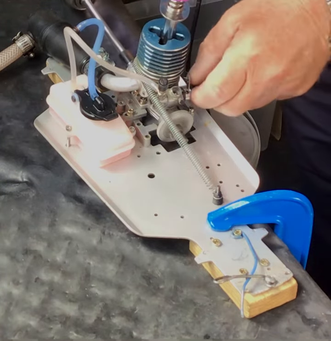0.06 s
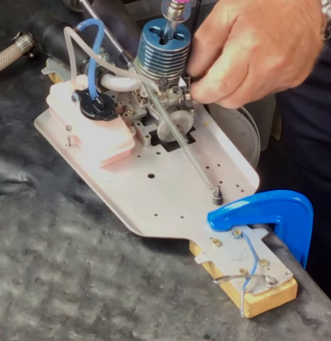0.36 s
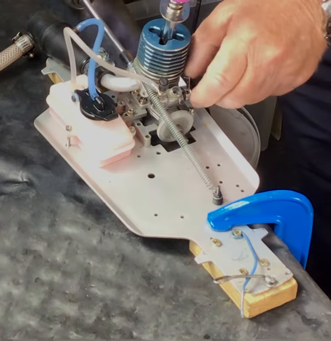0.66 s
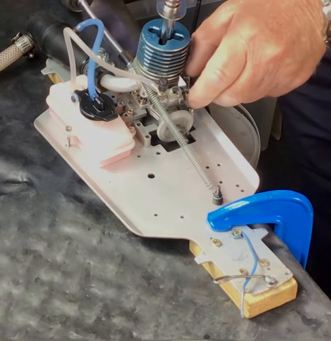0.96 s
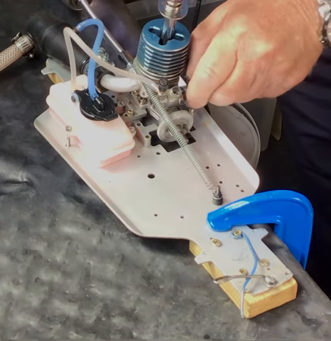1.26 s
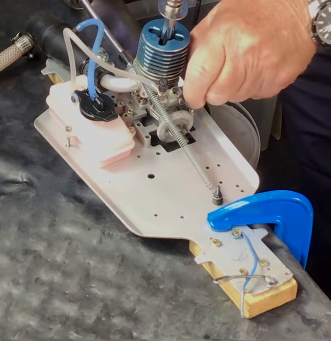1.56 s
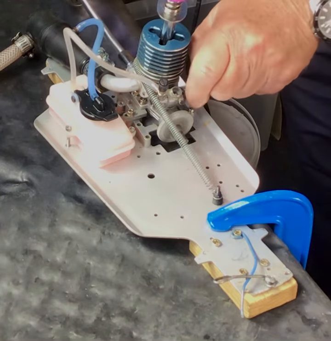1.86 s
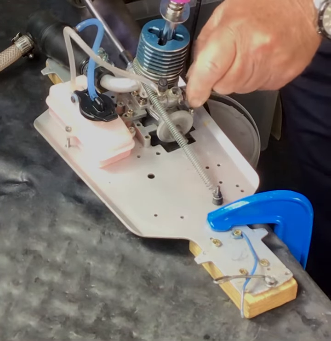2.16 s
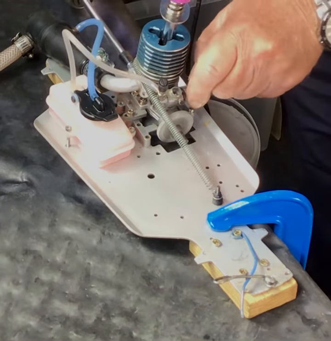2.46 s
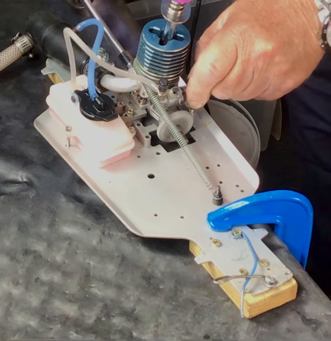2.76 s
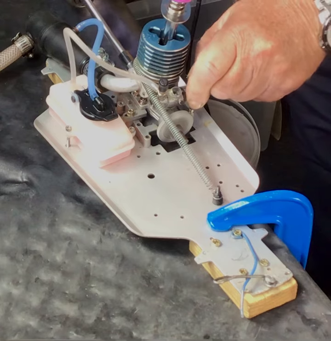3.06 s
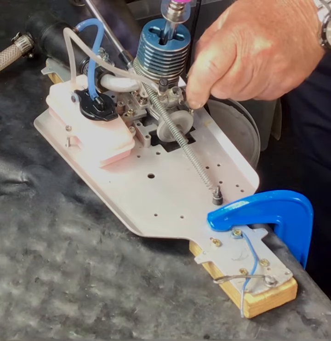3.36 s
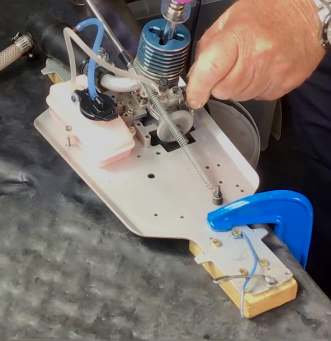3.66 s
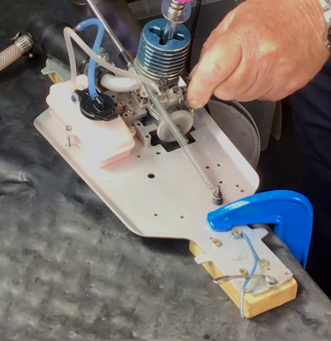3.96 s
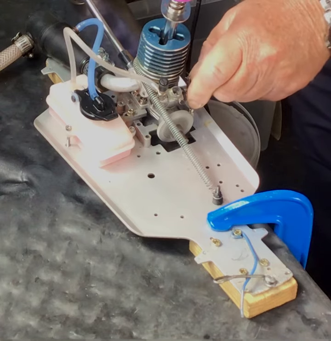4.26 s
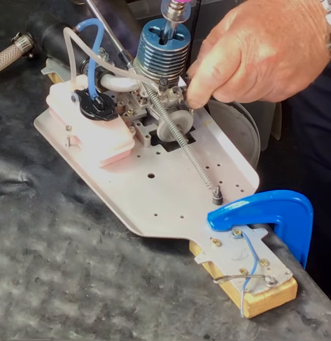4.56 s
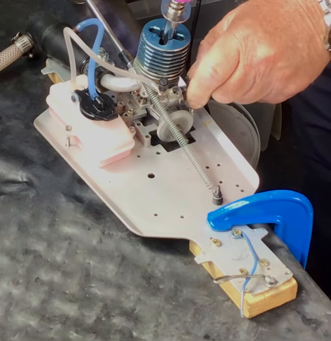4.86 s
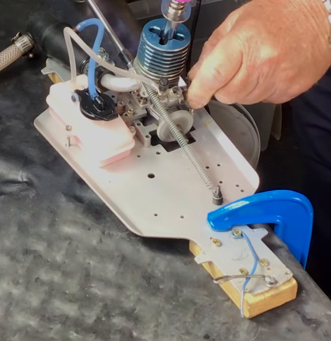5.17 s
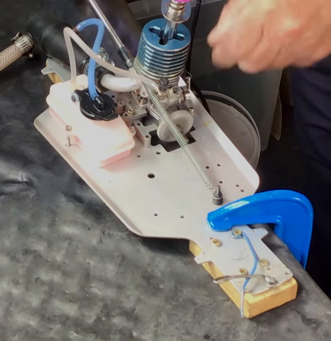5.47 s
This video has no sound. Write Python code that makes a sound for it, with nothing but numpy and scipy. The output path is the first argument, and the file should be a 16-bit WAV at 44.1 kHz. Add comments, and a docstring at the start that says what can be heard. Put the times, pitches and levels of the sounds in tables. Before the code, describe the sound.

A cordless drill turns over a small two-stroke model engine on a workbench, heard close by. The first burst of metallic clatter and hard knocks lasts until about 0.3 seconds. A second runs from 0.4 to 0.9 seconds, ending in a brief false start as the bench rumbles. In the pause there is low, steady workshop noise, two soft hand bumps around 1.1 seconds and one faint bird chirp at 1.5 seconds. The drill whines thinly at 1.6 seconds and cranks again, and the engine catches at about 1.9 seconds with a loud, raspy buzz. It revs up and down in four quick blips near 2.4, 2.8, 3.2 and 3.6 seconds, the last one lower and gentler. From about 4 seconds to the end, around 5.5 seconds, it holds a lumpy idle, with uneven exhaust pops, misfires and rattling, ringing metal.

```python
"""A small two-stroke model engine, clamped to a workbench, is spun twice by a cordless drill and
catches on the third try. It is blipped four times, then sinks to a lumpy idle. Each turn excites
resonators: a pressure pulse pops through the silencer, turbulent gas rasps from the port, and knocks
ring the cooling fins and metal chassis. The bench rumbles, the drill whines thinly, and a bird
chirps faintly in the pause, over the steady noise of the workshop."""
import sys
import numpy as np
from scipy import signal
from scipy.io import wavfile
from scipy.ndimage import uniform_filter1d

SR = 44100
rng = np.random.default_rng(int(sys.argv[2]) if len(sys.argv) > 2 else 0)


def output_pcm(signal):
    """Save a mono or channel-first signal as 16-bit PCM at the path in sys.argv[1].

    Samples are clipped to [-1, 1] before scaling.
    """
    pcm = np.clip(np.atleast_2d(signal).T, -1, 1) * 32767
    wavfile.write(sys.argv[1], SR, np.round(pcm).astype(np.int16))


N = 242550
TIME = np.arange(N) / SR
BINS = np.fft.rfftfreq(8192, 1 / SR)

# workshop background noise: (frequency [Hz], relative spectral density [dB])
AIR_SPECTRUM = [(18, -33), (30, -13.5), (65, 2), (150, -3), (234, -8.5), (281, -2), (394, -11.5),
                (645, -11), (716, -17.5), (1170, -20), (1370, -29.5), (1650, -24.5), (2030, -29.5),
                (4780, -31), (15000, -47.5)]
# contour of the bird's chirp: (time [s], pitch [Hz], level [dB])
BIRD_CHIRP = [(1.448, 3100, -76), (1.462, 3900, -62), (1.469, 4850, -51), (1.479, 4950, -58),
              (1.487, 4600, -47), (1.495, 4520, -54), (1.501, 3150, -63), (1.535, 3000, -67)]
# the drill's speed control whines as the trigger is squeezed: (start [s], end [s], level [dB])
TRIGGER_SQUEEZES = [(0.401, .45, -80), (1.596, 1.66, -70)]
# response of the jostled bench: (frequency [Hz], gain [dB])
BENCH_RESPONSE = [(25, -38), (48, -15), (80, 3), (150, 0.5), (280, -6.5), (450, -10.5), (1000, -27.5),
                  (4000, -63.5)]
# a hand bumps the bench and carburettor while the engine stands: (time [s], level [dB])
HAND_BUMPS = [(1.077, -49), (1.169, -53)]
# modes of fins, crankcase and chassis: (frequency [Hz], width [Hz], gain [dB])
METAL_MODES = [(737, 50, -4), (1180, 140, -30), (1537, 41, -0.5), (1624, 58, 3), (1768, 79, -1.5),
               (1893, 71, 7.5), (2344, 62, 3.5), (2482, 130, 2.5), (2620, 160, -11), (3250, 43, -3),
               (3450, 67, -1), (3630, 65, 3), (3793, 72, 8), (4070, 116, -1.5), (4300, 110, 2.5),
               (4495, 78, 3), (4795, 110, 0), (5017, 113, 4.5), (5275, 142, 5.5), (5540, 204, 1.5),
               (5674, 80, 2), (6700, 720, -6), (7450, 260, -3), (8580, 400, -5.5), (9150, 300, 1.5),
               (9820, 430, 1.5), (11010, 370, -3.5), (11950, 120, -3.5), (12340, 170, -0.5),
               (13300, 420, -6)]
# dense weak resonances between those modes: (frequency [Hz], gain [dB])
METAL_FLOOR = [(100, -22), (500, -31.5), (1000, -15.5), (3000, -13.5), (6000, -36.5), (10500, -15),
               (15500, -14.5)]
# hard knocks while the drill drives the shaft: (time [s], level [dB])
SHAFT_JOLTS = [(0.0248, -15.5), (0.0918, -12.5), (0.244, -16), (0.429, -46), (0.4623, -20), (0.5003, -20.5),
               (0.788, -18.5), (0.8051, -14.5), (0.8544, -19), (0.8846, -16), (0.9064, -21.5),
               (1.6603, -27), (1.7918, -17)]
# the drill spins the engine: (start [s], release [s], spin-up time [s])
DRILL_PULLS = [(-.12, 0.254, .1), (.4, 0.928, 0.12), (1.588, 1.87, 0.2)]
# how much one turn differs from the next: (time [s], roughness [0-1])
ROUGHNESS = [(0, .85), (.75, .85), (.85, .6), (1.8, .85), (1.95, .4), (2.45, .36), (3.2, .16), (3.72, .1),
             (4.3, .68), (5.5, .5)]
# surges of speed: a false start, the catch, then four throttle blips:
# (peak time [s], nominal top speed [turns/s], rise [s], fall [s], opening bite [dB], closing lull [dB])
SPEED_SURGES = [(.85, 168, .13, 0.24, 0, 0), (1.94, 211, .066, 0.19, 0.5, -0.5),
                (2.44, 236, 0.083, 0.14, 2, -6), (2.83, 218, .079, .13, 0.5, -3.5),
                (3.2, 233, .08, .135, 2, 0.5), (3.605, 159, .16, 0.25, .5, 1)]
# spells of failed firing, and a brief dip of the pop at 2.06 s: (time [s], half length [s], change of pop level
# [dB])
MISFIRE_DIPS = [(2.06, .018, -7), (2.25, .035, -2.5), (3.83, .02, -9), (4.07, .018, -10), (4.22, .02, -5),
                (4.34, .02, -8), (4.45, 0.044, -14), (4.586, .03, -14), (4.79, .055, -11),
                (5.04, .025, -10), (5.15, .025, -12), (5.33, 0.046, -9), (5.5, .03, -11)]
# turbulent gas at the port: (frequency [Hz], relative spectral density [dB])
GAS_SPECTRUM = [(25, -46.5), (55, -34), (110, -3.5), (290, 9), (430, -1), (690, 1), (920, -6), (1250, -2.5),
                (1450, -6), (1800, 1), (2150, -1.5), (2650, 0), (3400, -6), (14000, -16.5)]
# response of the silencer to one pulse: (frequency [Hz], gain [dB])
SILENCER_RESPONSE = [(30, -45.5), (70, -7.5), (115, 1), (170, 2), (235, -4), (310, -10), (460, -19),
                     (580, -32.5), (720, -19.5), (1200, -44.5), (3000, -65.5)]

CRANK_HZ, IDLE_HZ = 104, 116.03  # turns a second under the drill and at idle
CATCH_S = 1.85  # from here the engine runs by itself
# level laws: (base level under the drill [dB], base level at idle [dB], slope [dB/octave of speed])
POP_LAW = (-40, -31.6, 19.6)
RASP_LAW = (-34.5, -43.5, 3.44)
CLATTER_LAW = (-35.5, -31.5, 3.1)
POP_CEILING_DB = -21.5  # the pop's law levels off at a full charge
FLOOD_DB, CLEAR_S = 6.5, 0.87  # unburnt fuel adds to the rasp at first, then clears


def amp(db):
    """Amplitude ratio of a level in decibels."""
    return 10 ** (np.asarray(db) / 20)


def unit(x):
    """Normalisation to rms 1."""
    return x / np.sqrt(np.mean(x ** 2) + 1e-20)


def curves(rows):
    """Linear interpolation of each column of a table over time."""
    s, *columns = np.transpose(rows)
    return [np.interp(TIME, s, c) for c in columns]


def spectrum(points, hz=BINS):
    """Gain interpolated on a log-frequency axis from (frequency [Hz], gain [dB])."""
    f, db = np.transpose(points)
    return amp(np.interp(np.log(hz + 1), np.log(f + 1), db))


def colour(x, gain):
    """Minimum-phase filtering: the response follows each blow and never precedes it."""
    log_gain = np.log(np.maximum(gain, 1e-5))
    circle = np.concatenate([log_gain, log_gain[-2:0:-1]])
    taps = np.fft.ifft(np.exp(np.conj(signal.hilbert(circle)))).real
    return signal.oaconvolve(x, taps[:len(gain)])[:N]


def highpass(x, order, hz):
    """Zero-phase filtering: the treble stays in phase with the signal it came from."""
    return signal.sosfiltfilt(signal.butter(order, hz, "high", fs=SR, output="sos"), x)


def steady(x, size):
    """Normalisation of the running power to 1 over spans of size samples."""
    power = uniform_filter1d(uniform_filter1d(x ** 2, size), size)
    return x / np.sqrt(abs(power) + 1e-12)


def waver(size):
    """Smoothed noise of rms 1 that changes about every size samples."""
    return unit(uniform_filter1d(uniform_filter1d(rng.standard_normal(N), size), size))


def arch(s, rise, fall):
    """Asymmetric Gaussian swell that reaches 1 at time s."""
    return np.exp(-((TIME - s) / np.where(TIME < s, rise, fall)) ** 2)


def workshop_air(level_db=-59):
    """Stationary noise, strongest in the bass, forms the ambient floor."""
    return amp(level_db) * unit(colour(rng.standard_normal(N), spectrum(AIR_SPECTRUM)))


def room(x, t60=0.18, wet_db=-12, band_hz=(300, 5000)):
    """Reverberation: reflections from bench and walls add a dull, exponentially decaying tail."""
    t = np.arange(SR // 3) / SR
    tail = rng.standard_normal(len(t)) * amp(-60 * t / t60) * (t > .004)
    band = signal.butter(1, band_hz, "band", fs=SR, output="sos")
    tail = signal.sosfilt(band, tail / np.linalg.norm(tail))
    return x + amp(wet_db) * signal.oaconvolve(x, tail)[:N]


def bird(husk_hz=190):
    """Frequency modulation: a tone glides up and down, made husky by random deviations."""
    hz, db = curves(BIRD_CHIRP)
    hz = hz + husk_hz * waver(size=25)
    singing = (TIME > BIRD_CHIRP[0][0]) & (TIME < BIRD_CHIRP[-1][0])
    return amp(db) * np.sin(2 * np.pi * np.cumsum(hz) / SR) * singing


def drill(whine_hz=3950, partials_db=(-3, 0, -5)):
    """Periodic switching in the drill's speed control gives a thin whine of three harmonics."""
    tone = sum(amp(db) * np.sin(2 * np.pi * k * whine_hz * TIME) for k, db in enumerate(partials_db, 1))
    envelope = sum(amp(db) * np.interp(TIME, [start, start + .01, end, end + .02], [0, 1, 1, 0])
                   for start, end, db in TRIGGER_SQUEEZES)
    return tone * envelope


def scatter(clicks, t60, count=4):
    """Contact chatter: each impulse lands on one of count points, each with its own decaying burst."""
    t = np.arange(SR // 16) / SR
    point = rng.integers(0, count, N)
    chatter = rng.standard_normal((count, len(t))) * amp(-60 * t / t60)
    return sum(signal.oaconvolve(clicks * (point == k), unit(chatter[k]))[:N] for k in range(count))


def metal(x):
    """Modal resonance: fins, crankcase and chassis ring at their natural frequencies."""
    mode_power = sum((amp(db) / (1 + ((BINS - hz) / (0.64 * width)) ** 2)) ** 2
                     for hz, width, db in METAL_MODES)
    return colour(x, np.sqrt(mode_power + spectrum(METAL_FLOOR) ** 2))


def bench(speed, rough, rumble_db, gain_db=6, db_per_octave=-10, tick_db=-15):
    """Structure-borne sound: slow, uneven turns make the bench rumble; a hand's bump thuds and ticks."""
    response = spectrum(BENCH_RESPONSE)
    jostle = rough * amp(rumble_db + gain_db + db_per_octave * np.log2(np.maximum(speed, 100) / 100))
    rumble = jostle * unit(colour(rng.standard_normal(N), response))
    s, db = np.transpose(HAND_BUMPS)
    touches = np.bincount((s * SR).astype(int), amp(db), N)
    thuds = colour(scatter(touches, t60=.06), response)
    ticks = metal(scatter(touches, t60=.055))
    return rumble + amp(db.max()) * (thuds / abs(thuds).max() + amp(tick_db) * ticks / abs(ticks).max())


def jolts(gain_db=-1.5, t60=0.03):
    """Impact excitation: single hard knocks ring the metal while the drill drives the shaft."""
    s, db = np.transpose(SHAFT_JOLTS)
    impacts = np.bincount((s * SR).astype(int), amp(db), N)
    ring = metal(scatter(impacts, t60, count=8))
    return ring / abs(ring).max() * amp(db.max() + gain_db)


def fin_ring(knocks, fins_hz=(9210, 9360, 9530, 9680), t60=.32, relative_db=-25):
    """Free vibration: a few lightly damped cooling fins sing on after a hard knock."""
    t = np.arange(SR // 2) / SR
    modes = sum(np.sin(2 * np.pi * hz * t) for hz in fins_hz) * amp(-60 * t / t60)
    ring = signal.oaconvolve(knocks, modes)[:N]
    return unit(ring) * knocks.std() * amp(relative_db)


def motion(fade_db_per_s, steepness):
    """Power-law growth with each pull and exponential decay on release, in dB; 0 after the catch."""
    pulls_db = []
    for start, release, spin_up in DRILL_PULLS:
        progress = np.clip((TIME - start) / spin_up, 1e-3, 1)
        fade_db = fade_db_per_s * np.maximum(TIME - release, 0)
        pulls_db.append(steepness * 20 * np.log10(progress) - fade_db)
    return np.where(TIME < CATCH_S, np.max(pulls_db, 0), 0)


def throttle(bite_s=0.091, lull_s=0.058):
    """Amplitude modulation around the surges, in dB: a bite as the throttle opens, a lull as it shuts."""
    bite_db = sum(db * arch(s - .66 * rise, bite_s, bite_s) for s, _, rise, _, db, _ in SPEED_SURGES)
    lull_db = sum(db * arch(s + 1.48 * fall, lull_s, lull_s) for s, _, _, fall, _, db in SPEED_SURGES)
    return bite_db, lull_db


def revs(running, misfire_db, rough, hunt=.034, sag_per_db=.005):
    """Rotation rate sets the fundamental [Hz]: surges lift it, misfires drag it, rough running hunts."""
    base = CRANK_HZ + (IDLE_HZ - CRANK_HZ) * running
    speed = base + sum((top - base) * arch(s, rise, fall) for s, top, rise, fall, _, _ in SPEED_SURGES)
    return speed * (1 + sag_per_db * misfire_db) * (1 + hunt * rough * waver(size=1200))


def part_level(law, running, speed, drill_slope):
    """Power law of amplitude against speed, in dB; drill_slope scales its slope while cranking."""
    crank_db, idle_db, octave_db = law
    cranking_db = crank_db + drill_slope * octave_db * np.log2(speed / CRANK_HZ)
    firing_db = idle_db + octave_db * np.log2(speed / IDLE_HZ)
    return (1 - running) * cranking_db + running * firing_db


def controls(rough, takeover_s=.1, judder_db=1.7, flutter_db=1.15):
    """Common modulation: drill, throttle and misfires set the speed and the levels of the parts."""
    running = np.clip((TIME - CATCH_S) / takeover_s + .5, 0, 1)
    misfire_db = sum(db * arch(s, half, half) for s, half, db in MISFIRE_DIPS)
    speed = revs(running, misfire_db, rough)
    bite_db, lull_db = throttle()
    treble_db = motion(fade_db_per_s=514.5, steepness=1.96) + lull_db
    bass_db = motion(fade_db_per_s=230, steepness=3.6) + lull_db  # pop and rumble outlast the clatter
    flood_db = FLOOD_DB * running * np.exp(-np.maximum(TIME - CATCH_S, 0) / CLEAR_S)
    gas_db = part_level(RASP_LAW, running, speed, drill_slope=0) + flood_db
    hollow_db = -7 * np.exp(-((speed - 183.6) / 9.6) ** 2)  # the pop goes hollow around one pitch
    charge_db = np.minimum(part_level(POP_LAW, running, speed, drill_slope=1), POP_CEILING_DB)
    pop_db = charge_db + bass_db + misfire_db + hollow_db
    rasp_db = gas_db + treble_db + 1.4 * bite_db + flutter_db * waver(size=900)
    knock_db = part_level(CLATTER_LAW, running, speed, drill_slope=-1.1)  # firing relieves the drive
    clatter_db = knock_db + treble_db + bite_db + judder_db * (1 - running) * waver(size=600)
    shake_db = clatter_db + .27 * misfire_db
    rumble_db = gas_db + bass_db
    return speed, pop_db, rasp_db, clatter_db, shake_db, rumble_db


def strokes(turns, angle, slop, spread_db):
    """Jittered impulse train: one click a turn at angle [turns], uneven in time (slop) and in size."""
    lag, size = rng.standard_normal((2, 2048))
    turn = np.arange(1, int(turns[-1]))
    at = np.searchsorted(turns, turn)
    slop, spread_db = (slop * np.ones(N))[at], (spread_db * np.ones(N))[at]
    place = np.searchsorted(turns, turn + angle + slop * lag[turn])
    strength = amp(spread_db * np.clip(size[turn], -2, .8))  # often weak, never much too strong
    return np.bincount(place, strength, N + 1)[:N]


def shake(turns, speed, shake_db, bench_hz=226, width_hz=55, gain_db=-2, overtone_db=-14):
    """Forced vibration: the piston shakes the mount twice a turn, near a bench resonance at idle."""
    response = 1 / (1 + ((2 * speed - bench_hz) / (width_hz / 2)) ** 2)
    angle = 4 * np.pi * (turns + .045 * waver(size=700) - .17)
    swing = amp(4 * np.minimum(waver(size=700), 1.3))
    wave = np.cos(angle) + amp(overtone_db) * np.cos(2 * angle)
    return -np.sqrt(2) * amp(shake_db + gain_db) * swing * response * wave


def clatter(turns, speed, rough, clatter_db, gain_db=0.2, bright_db_per_octave=4.5, rattles_per_s=220):
    """Impact noise: the piston knocks at both ends of its stroke, and loose parts rattle in between."""
    slop = .025 + .11 * rough ** 2
    knocks = strokes(turns, .3, slop, 2 + 3 * rough) + amp(-4) * strokes(turns, .68, slop, 4)
    rattles = rng.random(N) < rattles_per_s / SR
    loose = rattles * amp(-8 + 3 * np.minimum(rng.standard_normal(N), 2))
    blows = unit(scatter(knocks + loose, t60=.016, count=12)) + amp(-14) * rng.standard_normal(N)
    ring = metal(blows)
    treble = highpass(ring, order=2, hz=6500)
    hardness = amp(bright_db_per_octave * np.log2(speed / 120) - rough ** 2)  # harder blows are brighter
    return amp(clatter_db + gain_db) * steady(ring + (hardness - 1) * treble, size=2000)


def rasp(turns, rough, rasp_db, gain_db=6, leak=0.94, decay_turns=0.44):
    """Turbulent jet noise: gas tears out each time the port opens and eases until the next turn."""
    gate = leak + np.exp(-(turns % 1) / decay_turns)
    blast = amp(2.2 * rough * rng.standard_normal(2048)[turns.astype(int)])
    gas = colour(gate * blast * rng.standard_normal(N), spectrum(GAS_SPECTRUM))
    return amp(rasp_db + gain_db) * steady(gas, size=3000)


def exhaust(turns, speed, pop_db, rough, lumpy_db=-3):
    """Source and filter: one pulse a turn rings the silencer; weak and mistimed firings make it lumpy."""
    pulses = strokes(turns, angle=0, slop=.012 + .08 * rough, spread_db=7 * rough)
    fundamental_rms = np.sqrt(2) * speed * spectrum(SILENCER_RESPONSE, speed) / SR  # for unit pulses
    size = amp(pop_db + lumpy_db * rough) / fundamental_rms
    pops = -colour(pulses * size, spectrum(SILENCER_RESPONSE))
    overtones = highpass(pops, order=6, hz=275)
    burn_db = 4.5 * np.minimum(waver(size=1000), 1.2)  # the burn varies, so the overtones come and go
    sharp_db = 1.5 - 6 * np.log2(np.maximum(speed, 110) / 110)  # slow pops are sharp, fast ones merge
    return pops + (amp(burn_db + sharp_db) - 1) * overtones


def scene():
    """Superposition at one listening point; the crank angle keeps the engine's cyclic sounds in step."""
    rough, = curves(ROUGHNESS)
    speed, pop_db, rasp_db, clatter_db, shake_db, rumble_db = controls(rough)
    turns = np.cumsum(speed) / SR
    clacks = jolts()
    knocking = clatter(turns, speed, rough, clatter_db) + clacks + fin_ring(clacks)
    gas = exhaust(turns, speed, pop_db, rough) + rasp(turns, rough, rasp_db)
    mount = (1 - rough) * shake(turns, speed, shake_db) + bench(speed, rough, rumble_db)
    air = workshop_air()
    machine = room(gas + knocking + mount + drill())
    chirp = room(bird(), t60=0.2, wet_db=-6)
    return np.tile(machine + chirp + air, (2, 1))


def record(dry, edge_hz=15800):
    """Band limiting: a steep linear-phase low-pass removes the highest treble."""
    taps = signal.firwin(1023, edge_hz, window=("kaiser", 9), fs=SR)
    return signal.oaconvolve(dry, taps[None], "same")


dry = scene()
out = record(dry)
output_pcm(out)
```